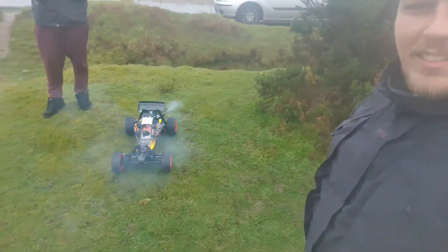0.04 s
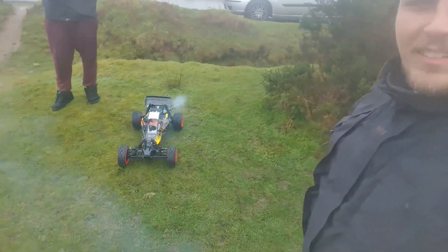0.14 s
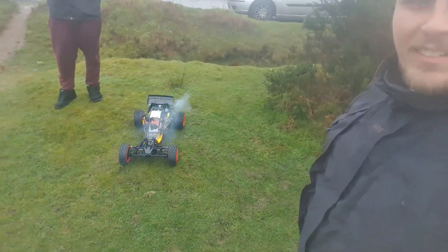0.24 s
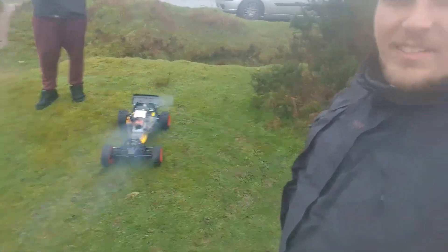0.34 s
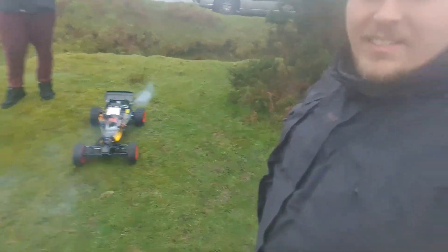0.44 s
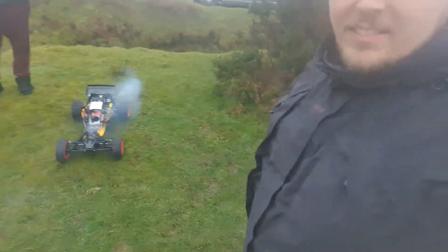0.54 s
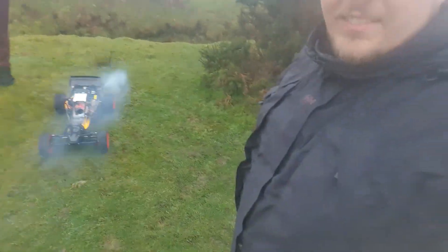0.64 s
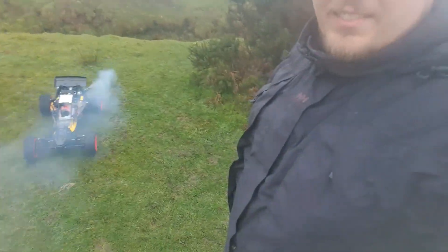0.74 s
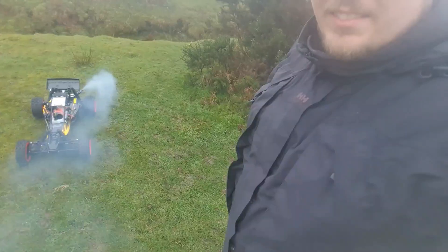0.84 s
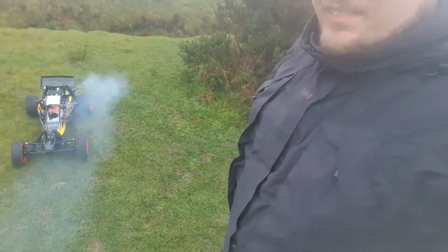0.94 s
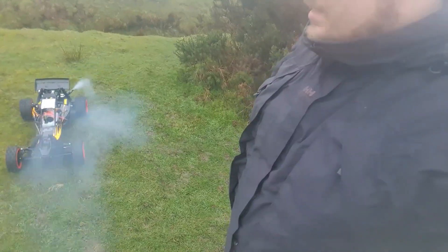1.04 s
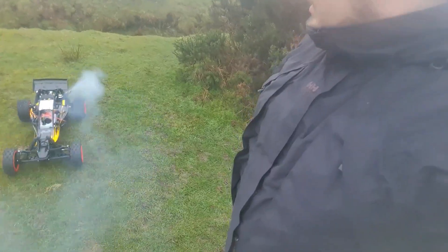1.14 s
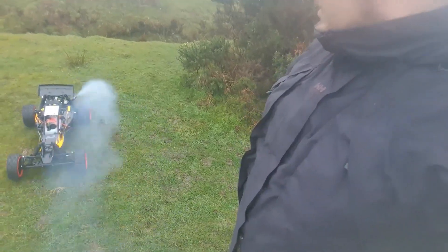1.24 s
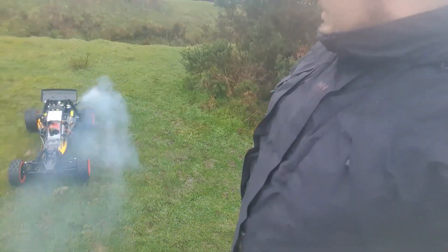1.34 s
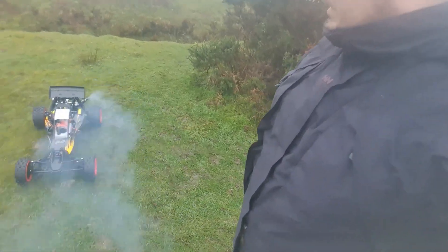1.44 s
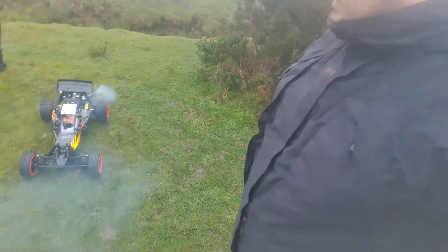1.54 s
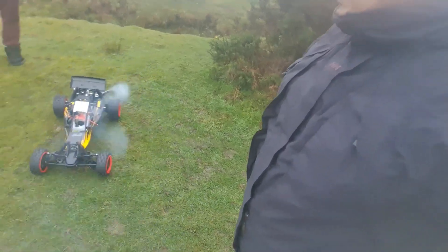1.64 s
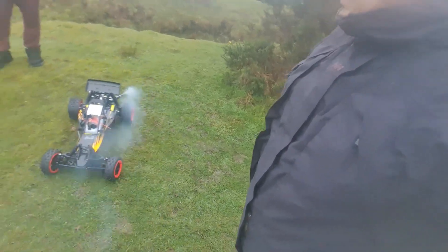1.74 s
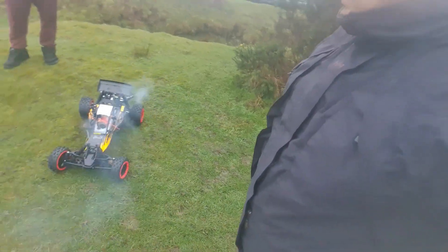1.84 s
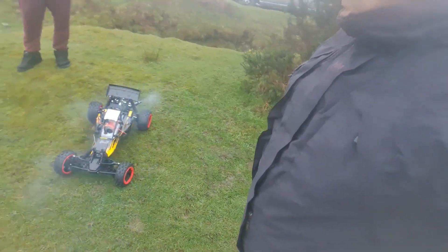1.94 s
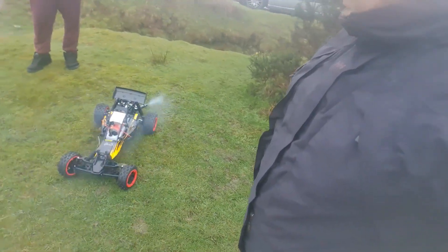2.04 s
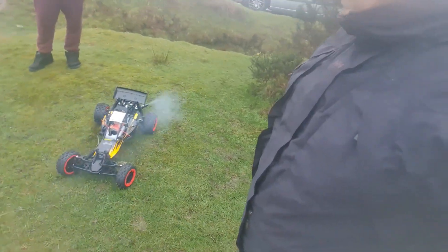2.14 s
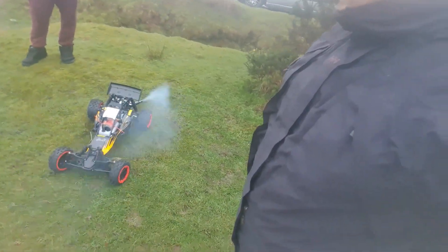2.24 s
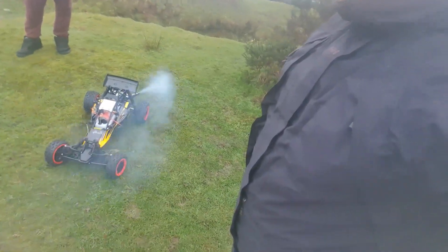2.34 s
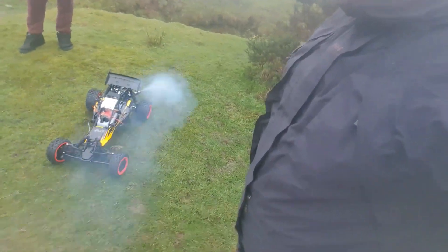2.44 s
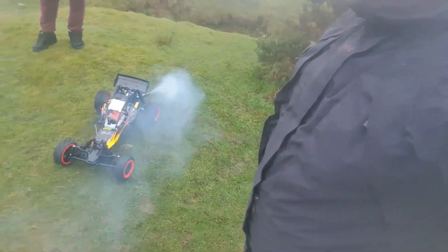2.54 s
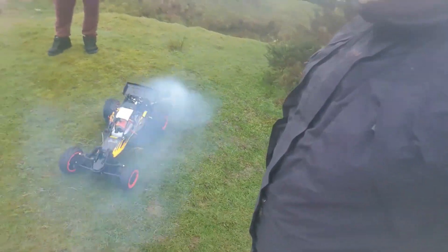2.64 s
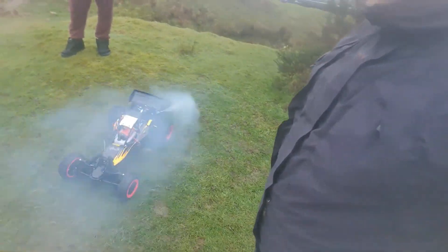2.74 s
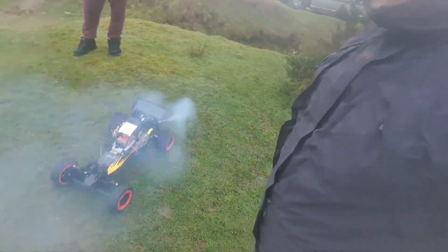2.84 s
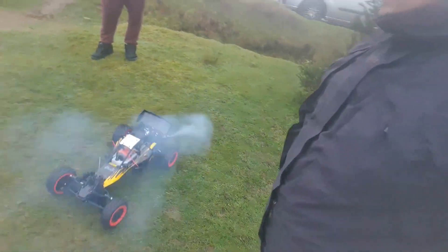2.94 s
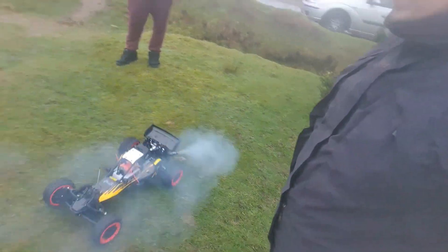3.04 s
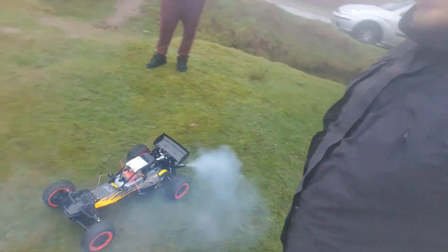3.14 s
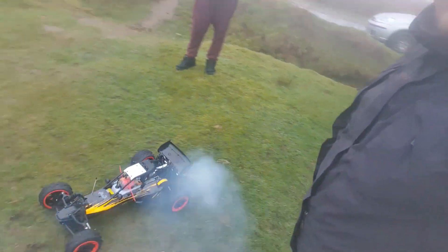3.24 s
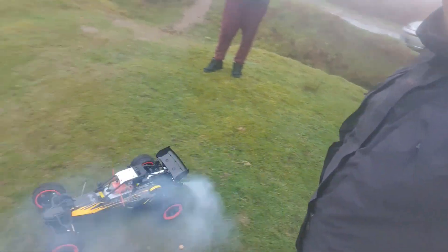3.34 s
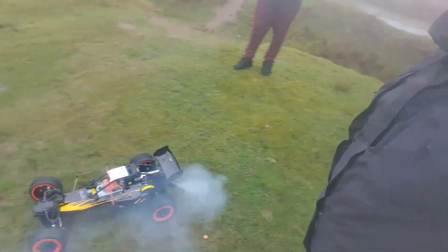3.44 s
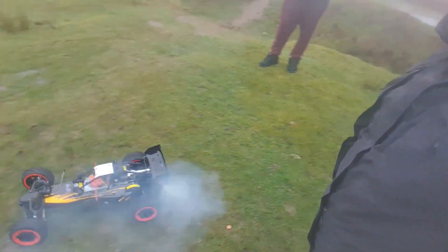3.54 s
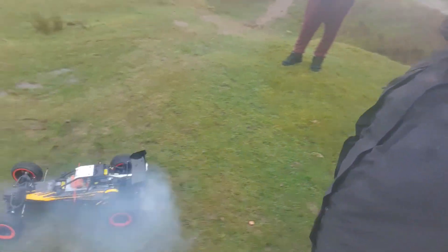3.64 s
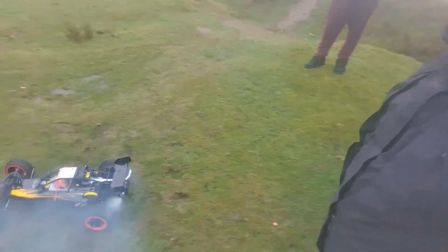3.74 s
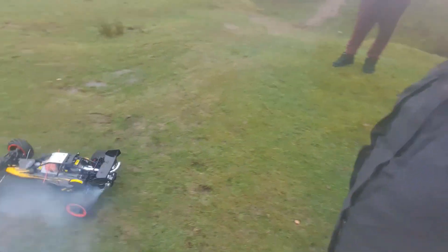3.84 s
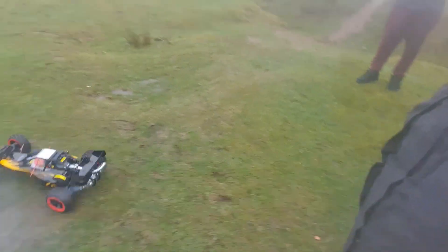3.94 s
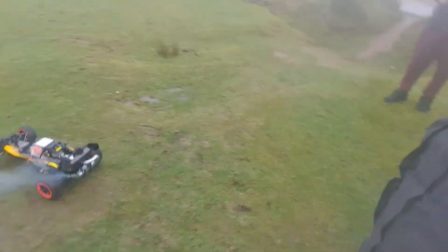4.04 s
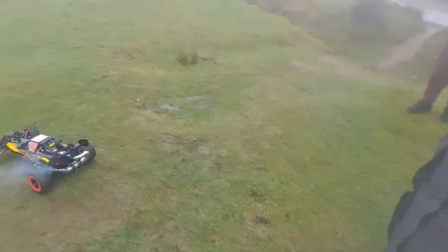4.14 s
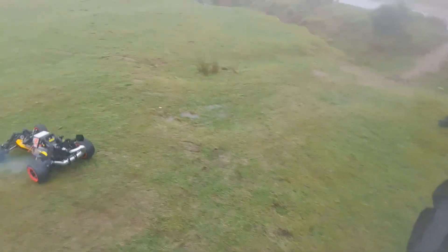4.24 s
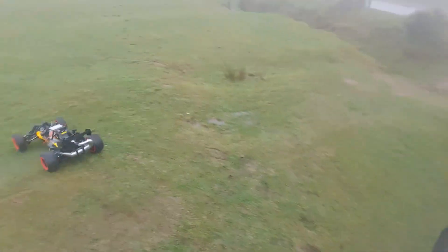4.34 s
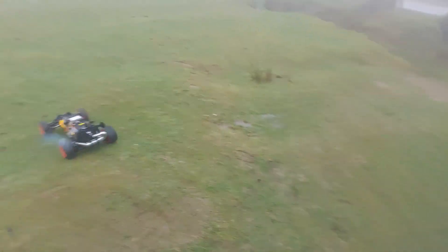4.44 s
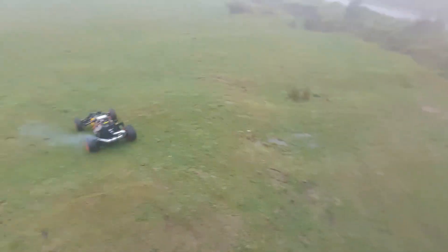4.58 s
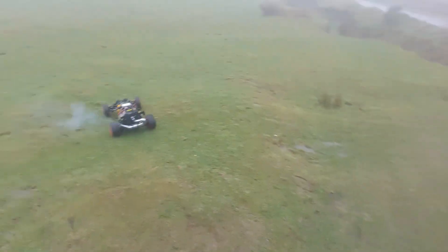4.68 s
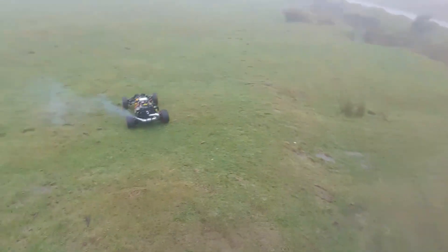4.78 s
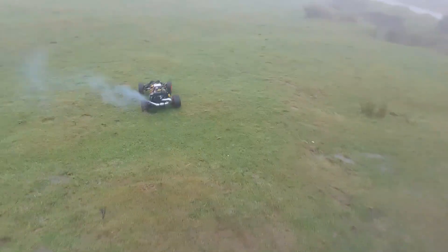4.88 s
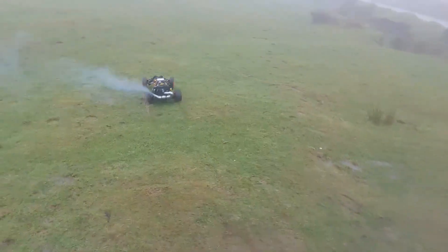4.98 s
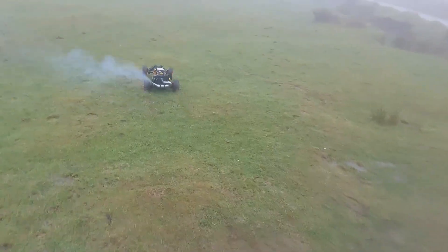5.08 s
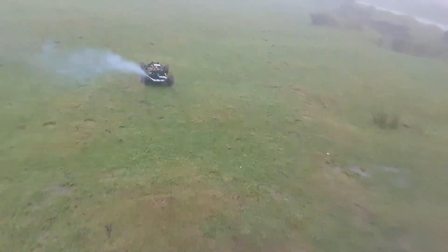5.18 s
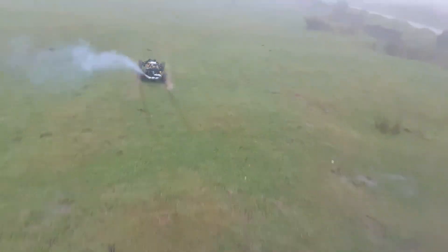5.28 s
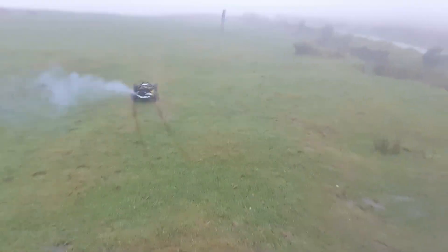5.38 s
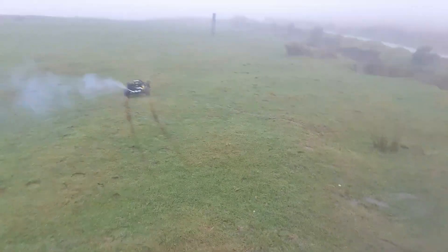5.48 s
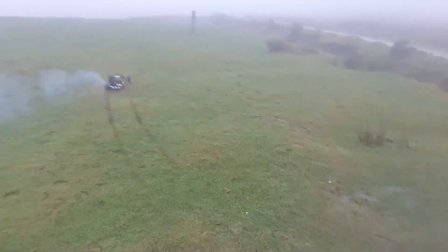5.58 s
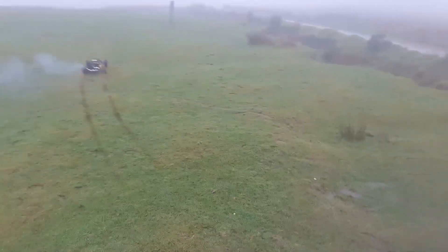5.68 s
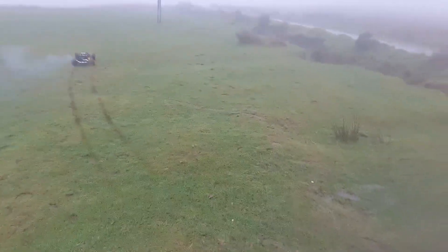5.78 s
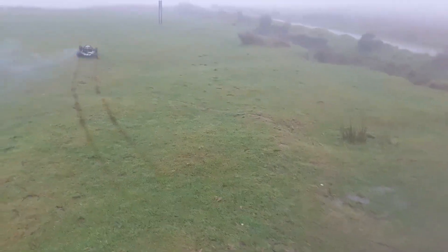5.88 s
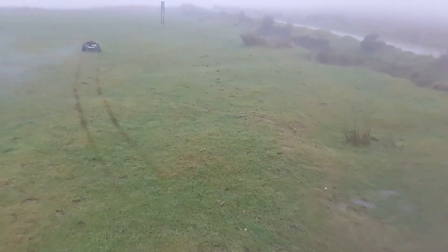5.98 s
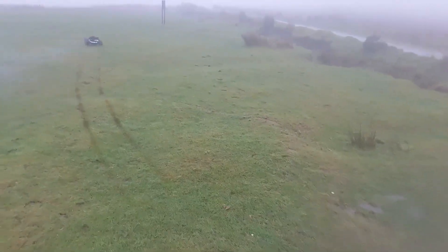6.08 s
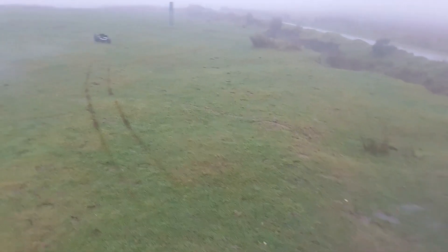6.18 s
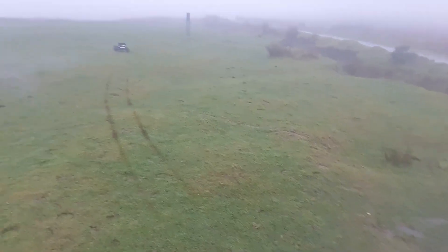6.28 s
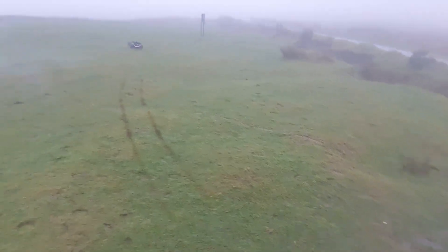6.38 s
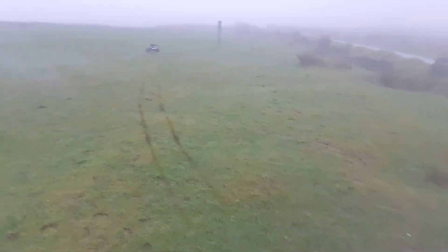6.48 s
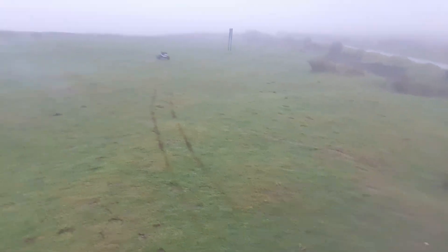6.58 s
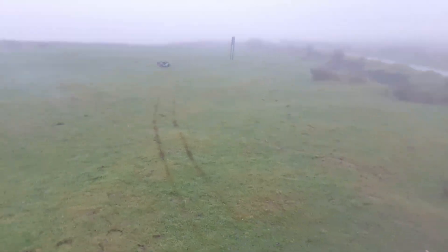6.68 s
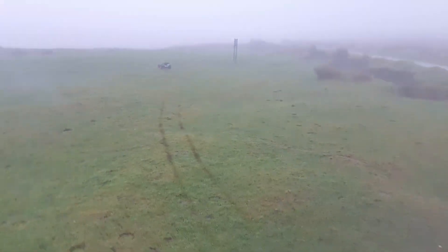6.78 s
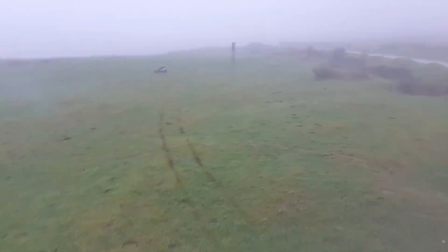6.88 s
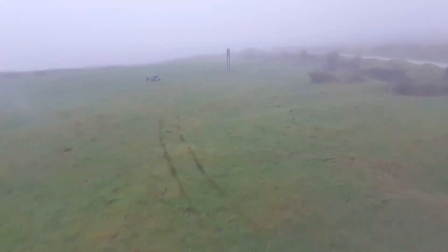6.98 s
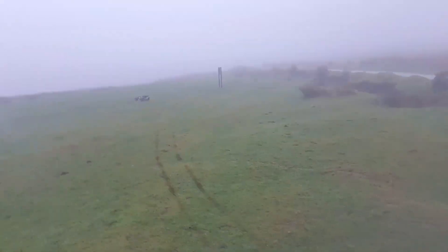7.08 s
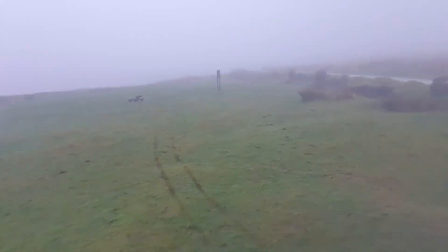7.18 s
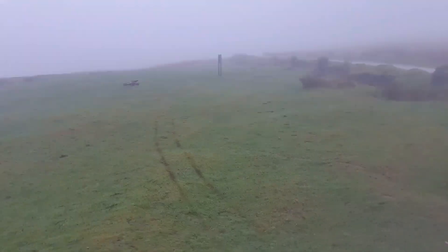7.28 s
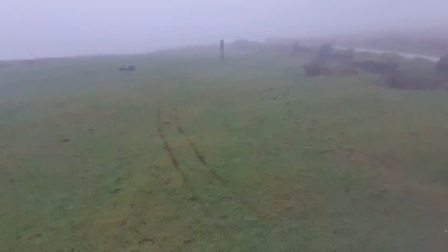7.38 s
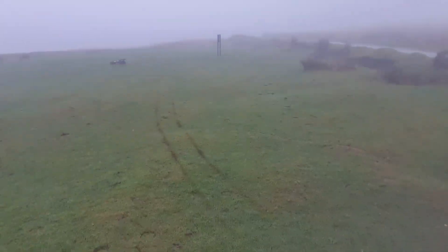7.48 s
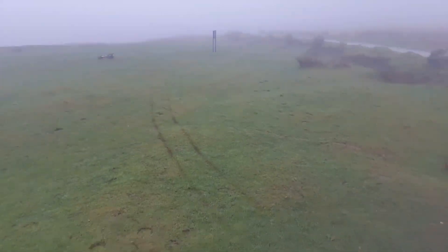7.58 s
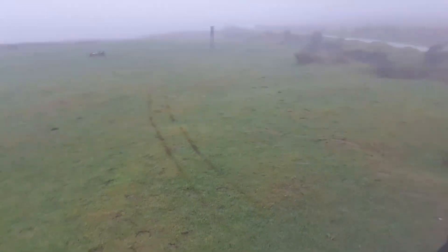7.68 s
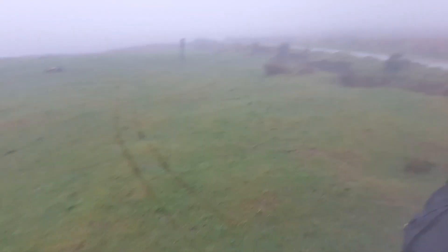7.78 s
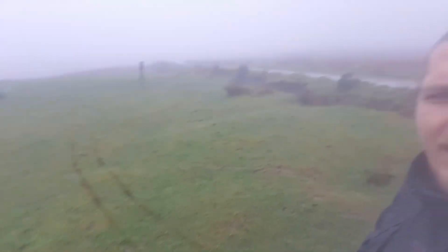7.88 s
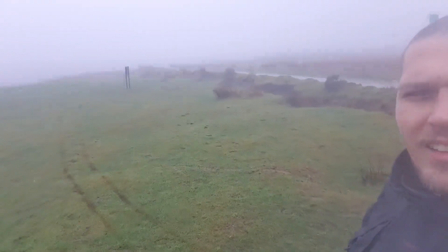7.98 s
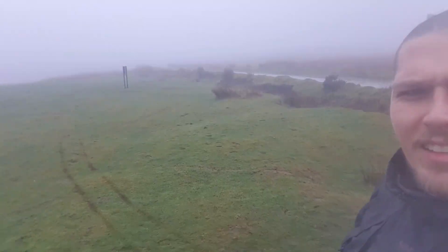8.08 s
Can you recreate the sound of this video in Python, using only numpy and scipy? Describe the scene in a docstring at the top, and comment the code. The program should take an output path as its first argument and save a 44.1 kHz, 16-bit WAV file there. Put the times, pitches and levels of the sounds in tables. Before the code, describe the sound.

Outdoors on open grass, a small two-stroke model buggy sputters close to a handheld stereo microphone. Early wind thumps give way to harsh crackling throttle blips with dips between, then a sustained raspy rev. It stutters in short bursts, pulls away at a high buzzing scream, and drops off throttle. Strong wind buffets then cover a faint engine rattle, before brief distant crackling revs return at the end.

```python
"""Open grass in gusty wind: a small two-stroke petrol buggy blips its throttle, drives past and races away.
The crank pumps a drone on every turn; the charge fires on every turn or every few, each burn a sharp crack.
Piston slap, rattle, intake roar and jet hiss join in; a reflection off the grass colours the engine.
Wind noise is mostly independent at the two microphone ports; buffets hit fast and die slower."""
import sys
import numpy as np
from scipy import signal
from scipy.fft import rfft, irfft, next_fast_len
from scipy.io import wavfile
from scipy.ndimage import uniform_filter1d, map_coordinates

SR = 44100
rng = np.random.default_rng(int(sys.argv[2]) if len(sys.argv) > 2 else 0)


def output_pcm(signal):
    """Save a mono or channel-first signal as 16-bit PCM at the path in sys.argv[1].

    Samples are clipped to [-1, 1] before scaling.
    """
    pcm = np.clip(np.atleast_2d(signal).T, -1, 1) * 32767
    wavfile.write(sys.argv[1], SR, np.round(pcm).astype(np.int16))


N = 358001

# wind floor: (time [s], rumble [dB], flutter [dB], left minus right [dB])
WIND_FLOOR = [(0, -49, -49.5, -1.5), (.9, -58, -67, -5.5), (1.5, -61, -64, -3), (2.4, -69, -68.5, -1),
              (3.4, -77, -72, -12), (4.7, -70, -67.5, 3), (5.8, -63, -57, 1.5), (6.12, -66.5, -64, 3),
              (6.2, -49, -42.5, -3), (7.2, -51, -51, -4), (7.55, -39.5, -30.5, -7), (7.85, -50, -43, -6.5),
              (8.12, -53, -53, 3)]
# buffets: (time of peak [s], rumble [dB], flutter [dB])
BUFFETS = [(.04, -43, -53), (.11, -40.5, -55), (.18, -40.5, -47), (.255, -41, -51), (.43, -37, -45),
           (.48, -42, -60), (.68, -70, -61), (1.02, -42, -48), (1.179, -53, -67), (1.665, -49, -56),
           (2.1, -50, -49), (6.17, -42, -37), (6.3, -44, -38), (6.39, -42, -47), (6.53, -40, -38),
           (6.721, -37, -38), (6.811, -45, -40), (6.857, -50, -46), (6.97, -47, -43.5), (7.041, -48, -44),
           (7.14, -45, -39), (7.278, -53, -46), (7.361, -46, -35.5), (7.459, -44, -32), (7.511, -48, -30),
           (7.57, -56, -25), (7.619, -29.5, -32), (7.658, -35, -28), (7.78, -38, -37),
           (7.939, -43.5, -40.5)]
# wind spectra, relative: (frequency [Hz], level [dB])
RUMBLE_SPECTRUM = [(20, -37), (35, -5), (65, 7.5), (110, 4), (190, 1), (330, -46)]
FLUTTER_SPECTRUM = [(120, -22.5), (230, -1.5), (380, 1), (600, -1.5), (900, -6.5), (1500, -15.5),
                    (3000, -51)]
GUST_RISE_DB_PER_S, GUST_FALL_DB_PER_S = 504, 191
VEER_DB, RUMBLE_LEFT_DB = -3, 6

# bearing of the buggy: (time [s], lag of right port [ms])
BEARING = [(0, .105), (.3, .1), (.75, .19), (1.25, .215), (1.6, .205), (2.1, .13), (2.6, .125), (3.3, .055),
           (3.6, .08), (3.85, .155), (4.3, .228), (4.55, .205), (4.9, .122), (5.1, .113), (5.5, .142),
           (5.8, .2), (6.25, .176), (6.75, .096), (7.3, .132), (7.6, .14), (7.88, .238), (8.12, .33)]
# bounce off the grass: (time [s], delay [ms], level [dB])
GRASS_BOUNCE = [(0, .55, -9), (1.5, .55, -9), (2.0, .78, -7), (3.0, .78, -5), (3.3, .78, -5),
                (3.6, .74, -6), (4.0, .7, -7), (4.7, .43, -4), (5.2, .36, -3), (5.6, .31, -4),
                (6.0, .31, -4), (6.3, .3, -9), (7.0, .2, -7), (7.45, .17, -2), (7.7, .165, -2),
                (7.9, .142, -2), (8.12, .14, -2)]
GRASS_TOP_HZ = 6600
AHEAD_PAN_DB, PAN_DB_PER_MS = 3.33, -26  # left minus right
# treble as the tailpipe swings to and from the listener: (time [s], level [dB])
TAILPIPE_TREBLE = [(0, -4), (1.0, 0.5), (1.8, -2), (2.3, -0.5), (2.8, -0.5), (3.2, 5.5), (3.7, 1.5),
                   (4.3, -0.5), (4.8, -0.5), (5.2, 0.5), (5.9, 0.5), (6.5, -4.5), (7.0, -2.5), (7.4, -4),
                   (7.7, 1.5), (8.12, 3.5)]

# speed the crank heads for after each throttle move: (time [s], crank speed [Hz])
THROTTLE_MOVES = [(0, 65.6), (0.249, 119.9), (.38, 76.8), (0.451, 122.2), (.5, 164.9), (.7, 122.9),
                  (.83, 157.9), (.97, 65.4), (1.09, 139.1), (1.139, 168), (1.33, 65.5), (1.84, 89.6),
                  (2.07, 112), (2.14, 135.9), (2.21, 161.4), (3.33, 168.8), (3.551, 160.5), (3.69, 65.9),
                  (3.806, 174.5), (3.91, 63.7), (4.005, 178), (4.101, 109.5), (4.18, 172.9), (4.265, 78.2),
                  (4.668, 179.5), (4.8, 172.6), (5.08, 185.2), (5.2, 180.6), (5.49, 206), (5.56, 132),
                  (5.671, 172.5), (5.74, 195.5), (5.811, 49.53), (5.9, 167.6), (5.991, 135.2), (6.05, 75.1),
                  (6.9, 80), (7.26, 89.4), (7.33, 59.97), (7.46, 117.3), (7.574, 85.15), (7.69, 184.5),
                  (7.82, 140.1), (7.911, 190), (8.05, 131.2)]
START_HZ, FULL_HZ = 132, 168
PICKUP_S, SAG_S = .07, .45  # time constants of running up and down
CREEP_HZ_PER_S = 6.0  # slow gain while held open
WOBBLE_TURNS = .002
# load on the drive, which takes up the play: (time [s], 0 coasting to 1 pulling [-])
DRIVE_LOAD = [(0, 0), (.45, 0), (.55, .6), (.95, .6), (1.0, 0), (1.1, 0), (1.17, .7), (1.36, .7), (1.42, 0),
              (2.1, 0), (2.25, .75), (3.7, .75), (3.75, .3), (3.82, 1), (4.3, 1), (4.36, 0), (4.65, 0),
              (4.75, 1), (6.03, 1), (6.1, .3), (7.66, .3), (7.8, .8), (8.12, 1)]
# engine levels, the last two before speed scaling:
# (time [s], drone above 1 kHz [dB], drone below 1 kHz [dB], clatter [dB])
ENGINE_LEVELS = [(0, -39.5, -81, -24.5), (.31, -43, -72, -25.5), (.7, -39, -84, -31),
                 (1.1, -38, -59, -32.5), (1.31, -34, -47, -31), (1.45, -39.5, -61, -34),
                 (1.63, -38, -48, -27), (1.78, -44, -45, -30), (1.95, -43, -70, -27), (2.31, -38, -94, -31),
                 (2.55, -49, -31, -33), (3.12, -40, -41, -31.5), (3.5, -51, -32, -35),
                 (3.85, -58, -40, -30.5), (4.2, -64, -37.5, -33.5), (4.65, -44, -40, -34.5),
                 (4.85, -35, -37.5, -26.5), (5.11, -45.5, -28, -24), (5.25, -50, -31, -21),
                 (5.85, -59, -33, -29), (6.0, -50, -44, -38), (6.2, -50, -58, -44), (6.7, -64, -52, -37),
                 (7.0, -58, -42, -34.5), (7.42, -74, -36, -26.5), (7.55, -45, -33, -25.5),
                 (7.85, -72, -53.5, -28.5), (8.0, -44, -36.5, -24.5), (8.12, -57, -40.5, -31)]
# low drone gain as the crank nears the pipe's tune: (crank speed [Hz], gain [dB])
PIPE_TUNE = [(80, -27), (150, -3.5), (168, 2.5), (200, 0.5)]
# noise between cracks, lower at a clean full-throttle pull: (time [s], gain [dB])
BETWEEN_CRACKS = [(0, -2), (.4, -2), (.5, 0), (4.7, 0), (4.8, -4), (5.05, -4), (5.12, -11), (5.55, -10),
                  (5.8, -6), (5.86, -2), (6.1, 0), (7.4, 0), (7.47, -4), (7.85, -5), (7.93, -9), (8.12, -9)]

# intake roar: (time [s], level [dB])
INTAKE_ROAR = [(0, -45), (.3, -49), (.55, -44), (1.2, -47), (1.67, -50), (1.9, -44), (2.5, -47),
               (3.16, -49), (4.16, -48), (4.34, -55), (4.68, -55), (4.97, -49), (5.63, -53), (6.24, -61),
               (7.0, -66), (7.4, -61), (7.6, -44), (8.12, -50)]
# intake resonances: (frequency [Hz], width [Hz], level [dB])
INTAKE_MODES = [(1179, 375, -1), (1500, 450, 1)]
SIZZLE_DB, SIZZLE_MS = -22, 3.94

# casing resonances: (frequency [Hz], width [Hz], level [dB])
CASING_MODES = [(1890, 960, -23), (2635, 720, 3.5), (4070, 410, 4.5), (5500, 2100, 2.5), (6670, 1300, -3),
                (10000, 2100, -23.5)]
# silencer resonances: (frequency [Hz], width [Hz], level [dB])
SILENCER_MODES = [(2007, 60, 7.5), (2520, 170, -5), (2893, 350, 8.5), (3794, 96, 8.5), (4210, 610, 5.5),
                  (5060, 1620, 0.5), (6250, 71, -13)]
CLATTER_DB_PER_OCTAVE = 23
PLAY_TURNS, TAUT_DB = .02, -7  # bore play when coasting; rattle gain at full load

# crank orders under load, relative: (multiple of crank speed [-], level [dB])
LOADED_ORDERS = [(1, -25), (2, -25), (3, -30), (4, -10), (5, 1), (6, -10), (7, 3), (8, -9), (9, 1),
                 (10, -6), (11, -6), (12, -6)]
# orders 1-12 off load, relative: level [dB]
COASTING_ORDERS = [-27, -20, -34.5, -10, -6, -2, -0.5, -0.5, -0.5, 2, 0.5, 0]
# the 7th and 9th orders shift as the pipe swings round: (time [s], 7th [dB], 9th [dB])
ORDER_ACCENT = [(0, 0, 0), (.6, 2, 10.5), (1.0, -10, 9), (1.3, -7, 5.5), (2.3, 3, -11), (2.95, -2.5, 0),
                (3.15, 6, 14), (3.4, -5, -19), (3.7, 6, 7), (4.3, 1, 9), (4.8, -0.5, 7.5),
                (5.15, -2.5, 13.5), (5.3, -1, -27), (6.0, -0.5, -11), (7.7, 25, 4), (8.12, -1, -36)]
# lowest orders: (time [s], level [dB])
LOW_HUM = [(0, -73.5), (1.35, -86), (1.45, -65.5), (1.62, -76), (1.85, -80), (2.1, -79), (2.4, -77),
           (3.5, -72.5), (4.4, -68.5), (4.55, -79), (4.62, -85), (4.7, -64), (5.1, -62), (5.8, -62),
           (6.05, -80.5), (8.12, -81)]
DRONE_TOP_HZ, TAIL_DB_PER_ORDER, DRONE_LEAD_TURNS = 2160, .8, .4

# runs of burns, on throttle or running down, level before scatter:
# (start [s], end [s], interval between burns [turns], chance of one more missed turn [0-1], level [dB])
BURN_RUNS = [(0.03, .075, 1, .1, -26.5), (0.14, .24, 3, .5, -34), (0.507, 0.644, 2, .1, -11),
             (0.658, 0.755, 3, 0, -11.5), (.846, 0.943, 3, 0, -11.5), (1.101, 1.224, 2, .3, -13),
             (1.23, 1.366, 2, 0, -12), (2.143, 2.343, 2, .2, -12), (2.355, 2.95, 2, .6, -10.5),
             (2.963, 3.686, 2, .01, -12), (3.82, 3.924, 1, .1, -15), (4.039, 4.145, 1, .05, -14),
             (4.184, 4.29, 1, .3, -14), (4.483, 4.51, 1, 0, -21), (4.7, 4.828, 1, .1, -13),
             (4.835, 5.045, 2, .1, -13.5), (5.057, 5.197, 1, 0.02, -11), (5.208, 5.817, 1, 0.05, -12.5),
             (5.823, 5.961, 2, .3, -14), (5.959, 5.974, 1, 0, -13.5), (5.976, 5.991, 1, 0, -16.5),
             (6.107, 6.356, 1, .1, -39), (6.399, 7.12, 4, .5, -65), (7.477, 7.563, 1, .4, -14.5),
             (7.689, 7.751, 1, .5, -12), (7.752, 7.815, 1, 0, -13), (7.82, 7.861, 1, 0, -15.5),
             (7.877, 7.885, 1, 0, -9.5), (7.901, 7.911, 1, 0, -22), (7.917, 8.107, 1, 0, -13.5)]
# single pops, at low speed and between runs, with a few sharp wind knocks after 6.8 s: (time [s], level [dB])
SINGLE_POPS = [(.2695, -9.5), (.2982, -6.5), (.3252, -7), (.3522, -8), (.3782, -8.5), (.4309, -20),
               (.441, -18), (.4663, -10), (.4931, -10.5), (.7575, -12), (.7821, -11), (.8082, -16),
               (.814, -10.5), (.8405, -14.5), (.9487, -12.5), (.9742, -14.5), (1.3931, -13.5),
               (1.8299, -24), (1.8813, -17.5), (1.9357, -19.5), (1.9892, -25), (2.0347, -21), (2.0707, -15),
               (2.1052, -11), (2.1252, -15), (3.6988, -13), (3.8095, -13), (4.0198, -11.5), (4.1664, -12.5),
               (4.5595, -26), (4.6578, -14.5), (4.6827, -15.5), (6.0003, -10), (6.0125, -18), (6.0245, -18),
               (6.043, -24), (6.052, -25), (6.258, -31), (6.6466, -34), (6.6857, -32), (6.7271, -31),
               (6.857, -33), (6.9, -37), (6.9666, -35), (7.042, -32), (7.1382, -25), (7.185, -36),
               (7.219, -40), (7.2554, -29), (7.292, -31), (7.3393, -27), (7.3752, -34), (7.424, -32)]
WEAK_BURN_DB = -20  # turns between burns
SPARK_TURN, SPARK_SCATTER_TURNS = .02, .003  # place in the turn, spread
# pipe resonances: (frequency [Hz], width [Hz], level [dB])
PIPE_MODES = [(774.7, 111, 12.5), (901, 198, 14.5), (1051, 254, 9.5), (1544, 74, 11.5), (1785, 168, 10)]
# colour of the shock, relative: (frequency [Hz], level [dB])
SHOCK_SPECTRUM = [(900, -35), (1500, -7.5), (2500, 1.5), (4000, 5.5), (6200, 0), (7200, -6), (8300, -8),
                  (10500, -3), (13000, -7), (15500, -29)]
CRACK_MS, BLAST_MS, PIPE_ECHO_MS = 0.24, 3.5, 3.45
BLAST_DB, THUMP_DB, RING_DB, PIPE_ECHO_DB = -22, -1, -6, -7

CUTOFF_HZ, OVERLOAD = 16900, .4


def from_db(db):
    """Decibels to gain."""
    return 10 ** (np.asarray(db) / 20)


def rms_one(x):
    """Scale to unit rms."""
    return x / np.sqrt(np.mean(x ** 2) + 1e-20)


def in_time(rows):
    """Table columns as curves, one value a sample."""
    s, *columns = np.transpose(rows)
    return [np.interp(np.arange(N) / SR, s, c) for c in columns]


def shaped(x, points):
    """Colour by a (Hz, dB) spectrum, interpolated on log frequency."""
    size = next_fast_len(N + 4096)
    hz = np.arange(size // 2 + 1) * SR / size + 1
    point_hz, point_db = np.transpose(points)
    gain = from_db(np.interp(np.log(hz), np.log(point_hz), point_db))
    return irfft(rfft(x, size) * gain, size)[..., :N]


def resonate(x, modes):
    """Parallel two-pole resonances with alternating signs."""
    out = np.zeros(N)
    for k, (hz, width_hz, db) in enumerate(modes):
        r = np.exp(-np.pi * width_hz / SR)
        a = [1, -2 * r * np.cos(2 * np.pi * hz / SR), r * r]
        out += (-1) ** k * from_db(db) * signal.lfilter([1 - r * r, 0, r * r - 1], a, x + 1e-18)
    return out


def decaying(x, fade_ms):
    """Exponential tail after each click."""
    return signal.lfilter([1], [1, -np.exp(-1000 / (fade_ms * SR))], x)


def filtered(x, order, hz, kind="low"):
    """Butterworth filter."""
    return signal.sosfilt(signal.butter(order, hz, kind, fs=SR, output="sos"), x)


def split(x, high_db, low_db):
    """Separate gains above and below about 1 kHz."""
    return from_db(high_db) * filtered(x, 4, 1030, "high") + from_db(low_db) * filtered(x, 4, 1030)


def delayed(x, ms):
    """Read x late by a fixed or moving delay."""
    return map_coordinates(x, [np.arange(N) - ms * SR / 1000], order=3)


def drift(rate_hz):
    """Slow random curve of unit rms: noise through a double one-pole low-pass."""
    r = np.exp(-2 * np.pi * rate_hz / SR)
    return rms_one(signal.lfilter([1], [1, -2 * r, r * r], rng.standard_normal(N + SR))[SR:])


def clicks(seconds, sizes):
    """One click at each time."""
    out = np.zeros(N)
    np.add.at(out, np.clip(np.asarray(seconds) * SR, 0, N - 1).astype(int), sizes)
    return out


def wind():
    """Lumpy low noise, mostly unrelated at the two ports; buffets hit fast and die slower."""
    rumble_db, flutter_db, pan_db = in_time(WIND_FLOOR)
    for s, gust_rumble_db, gust_flutter_db in BUFFETS:
        late_s = np.arange(N) / SR - s
        off_db = np.where(late_s < 0, GUST_RISE_DB_PER_S * late_s, -GUST_FALL_DB_PER_S * late_s)
        rumble_db = np.maximum(rumble_db, gust_rumble_db + off_db)
        flutter_db = np.maximum(flutter_db, gust_flutter_db + off_db)
    pan_db = pan_db + VEER_DB * drift(13.0)
    across = rng.standard_normal(N)  # big eddies push one port and pull the other
    out = np.zeros((2, N))
    for side in range(2):
        sign = 1 - 2 * side
        lean_db = pan_db / 2 * sign
        eddies = rng.standard_normal(N) + 0.63 * sign * across
        rumble = rms_one(shaped(eddies, RUMBLE_SPECTRUM) * from_db(3.0 * drift(18.0)))
        flutter = shaped(rng.standard_normal(N), FLUTTER_SPECTRUM)
        flutter = rms_one(flutter * from_db(3.5 * drift(60) + 2.2 * drift(18)))
        side_db = RUMBLE_LEFT_DB / 2 * (0.44 - 1.93 * side)
        out[side] = from_db(lean_db + side_db + rumble_db) * rumble
        out[side] += from_db(lean_db + flutter_db) * flutter
    return out


def crank_speed():
    """After each throttle move the crank runs up quickly or sags slowly towards its new speed."""
    t, speed_hz, now_hz = np.arange(N) / SR, np.zeros(N), START_HZ
    ends_s = [s for s, _ in THROTTLE_MOVES[1:]] + [N / SR]
    for (start_s, goal_hz), end_s in zip(THROTTLE_MOVES, ends_s):
        held = (t >= start_s) & (t < end_s)
        since_s, opening = t[held] - start_s, goal_hz > now_hz
        approach = np.exp(-since_s / (PICKUP_S if opening else SAG_S))
        creep_hz = opening * CREEP_HZ_PER_S * since_s
        speed_hz[held] = goal_hz + creep_hz + (now_hz - goal_hz) * approach
        now_hz = speed_hz[held][-1]
    return uniform_filter1d(speed_hz, size=SR // 50)  # the flywheel rounds the corners


def intake(turns):
    """Air gulped through the carburettor once a turn: pulsed noise in the intake resonances."""
    roar_db, = in_time(INTAKE_ROAR)
    gulp = 1 + 1.3 * np.cos(2 * np.pi * turns)
    air = rms_one(resonate(gulp * rng.standard_normal(N), INTAKE_MODES))
    return from_db(roar_db + 1.5 * drift(20)) * air


def clatter(turns, clatter_db, load):
    """The piston slaps at both ends of its stroke; gears and clutch rattle unevenly in the casing."""
    t, strokes = np.arange(N) / SR, np.arange(0, turns[-1], .5)
    slack = 1 - .85 * np.interp(strokes, turns, load)
    loose = strokes + PLAY_TURNS * slack * rng.standard_normal(len(strokes))
    # every other slap is 5 dB weaker
    slap_db = 2.0 * slack * rng.standard_normal(len(strokes)) - 10 * (strokes % 1)
    slaps = clicks(np.interp(loose, turns, t), from_db(slap_db))
    grains = rng.standard_normal(N) * from_db(2.8 * drift(790))
    rattle = from_db(TAUT_DB * load) * rms_one(resonate(grains, CASING_MODES))
    mix = .7 * rms_one(resonate(slaps, SILENCER_MODES)) + .75 * rattle
    return from_db(clatter_db + 1.0 * drift(27)) * mix


def crank_order(k, level_db, turns):
    """One order of the crank speed, wavering in level and phase; higher ones waver more in phase."""
    waver = from_db(2.0 * drift(8)) * np.exp(.03j * k * drift(20))
    phase = 2 * np.pi * k * (turns + DRONE_LEAD_TURNS) + k * k
    return from_db(level_db) * np.imag(waver * np.exp(1j * phase))


def drone(turns, high_db, low_db, load):
    """Pumping once a turn: a sum of crank orders whose balance follows the load."""
    accent_db = dict(zip((7, 9), in_time(ORDER_ACCENT)))
    levels = []
    for (k, db), coasting_db in zip(LOADED_ORDERS, COASTING_ORDERS):
        levels.append((k, load * (db + accent_db.get(k, 0)) + (1 - load) * coasting_db))
    last_db = levels[-1][1]
    levels += [(k, last_db - TAIL_DB_PER_ORDER * (k - 12)) for k in range(13, 25)]
    orders = [crank_order(k, db, turns) for k, db in levels]
    hum_db, = in_time(LOW_HUM)
    hum = sum(orders[:3]) + from_db(-5) * (1 - load) * orders[3]
    hum = hum / from_db(LOADED_ORDERS[0][1])
    body = filtered(sum(orders[3:]), 3, DRONE_TOP_HZ)
    return split(rms_one(body), high_db, low_db) + from_db(hum_db) * hum


def burns(turns):
    """In runs the engine fires on every turn or every few turns; any turns between burn weakly."""
    t = np.arange(N) / SR
    times_s, levels_db = [s for s, _ in SINGLE_POPS], [db for _, db in SINGLE_POPS]
    for start_s, end_s, every, miss, run_db in BURN_RUNS:
        luck, dice = rng.standard_normal((200, 2)), rng.random(200)
        first_turn = round(np.interp(start_s, t, turns) - SPARK_TURN) + SPARK_TURN
        due = 0
        for k in range(int(np.interp(end_s, t, turns) - first_turn) + 1):
            spark = first_turn + k + SPARK_SCATTER_TURNS * luck[k, 1]
            fires = k == due
            if fires:
                late, early = dice[k] < miss, dice[k] > 1 - miss / 4  # now and then it catches early
                due += max(1, round(every) + int(late) - int(early))
            spread_db = 1.8 if fires else 3.5
            times_s.append(np.interp(spark, turns, t))
            levels_db.append(run_db + (not fires) * WEAK_BURN_DB + spread_db * luck[k, 0])
    return clicks(times_s, from_db(levels_db))


def sizzle(fired):
    """The jet's top hiss after each burn scatters, so the ports hear it unalike."""
    hiss = filtered(rng.standard_normal((2, N)), 4, 8800, "high")
    return from_db(SIZZLE_DB) * delayed(decaying(fired, SIZZLE_MS), 0.32) * hiss


def exhaust(fired, low_db, between_db):
    """Each burn: shock, silencer ring and gas blast, with their return along the pipe, plus a thump."""
    u = np.arange(-1, 1, 2000 / (CRACK_MS * SR))
    pulse = np.where(u < 0, 1 + u, u - 1)  # rises, then snaps over
    shock = np.convolve(fired, pulse)[:N]
    gas = rms_one(resonate(rng.standard_normal(N), CASING_MODES[:-1]))
    blast = decaying(fired, BLAST_MS) * gas
    bright = shaped(shock, SHOCK_SPECTRUM)
    bright = bright + from_db(RING_DB + between_db / 2) * resonate(fired, SILENCER_MODES)
    bright = bright + from_db(BLAST_DB + between_db) * blast
    # the open end turns the wave over
    bright = bright - from_db(PIPE_ECHO_DB + between_db) * delayed(bright, PIPE_ECHO_MS)
    thump = split(resonate(fired, PIPE_MODES), 0, low_db - np.max(low_db))
    return bright + from_db(THUMP_DB) * thump


def at_ports(engine):
    """Tailpipe treble, grass bounce, then arrival a little earlier on the left, with scatter."""
    treble_db, = in_time(TAILPIPE_TREBLE)
    engine = engine + (from_db(treble_db) - 1) * shaped(engine, [(3300, -28), (5500, 5)])
    bounce_ms, bounce_db = in_time(GRASS_BOUNCE)
    # grass swallows the treble
    dulled = shaped(engine, [(GRASS_TOP_HZ / 2, 0), (GRASS_TOP_HZ, -9), (2 * GRASS_TOP_HZ, -20)])
    engine = engine + from_db(bounce_db) * delayed(dulled, bounce_ms)
    lag_ms, = in_time(BEARING)
    pan_db = AHEAD_PAN_DB + PAN_DB_PER_MS * lag_ms
    left = from_db(pan_db / 2) * delayed(engine, 1 - lag_ms / 2)
    right = from_db(-pan_db / 2) * delayed(engine, 1 + lag_ms / 2)
    scatter = np.array([delayed(engine, 7.3), -delayed(engine, 11.0)])  # off bushes and bystanders
    return np.array([left, right]) + from_db(-14) * scatter


def scene():
    """Wind over grass and the engine; drone, slaps, roar and runs of burns follow one crank."""
    speed_hz = crank_speed()
    turns = np.cumsum(speed_hz) / SR + WOBBLE_TURNS * drift(25)
    high_db, low_db, clatter_db = in_time(ENGINE_LEVELS)
    low_db = low_db + np.interp(speed_hz, *np.transpose(PIPE_TUNE))
    clatter_db = clatter_db + CLATTER_DB_PER_OCTAVE * np.log2(speed_hz / FULL_HZ)
    (load,), (between_db,) = in_time(DRIVE_LOAD), in_time(BETWEEN_CRACKS)
    fired = burns(turns)
    engine = intake(turns) + clatter(turns, clatter_db + between_db, load)
    engine = engine + drone(turns, high_db, low_db, load) + exhaust(fired, low_db, between_db)
    return wind() + sizzle(fired) + at_ports(engine)


def record(dry):
    """The highest peaks are rounded, the top is cut."""
    rounded = OVERLOAD * np.tanh(dry / OVERLOAD)
    return signal.sosfilt(signal.cheby2(12, 60, CUTOFF_HZ, fs=SR, output="sos"), rounded)


dry = scene()
out = record(dry)
output_pcm(out)
```